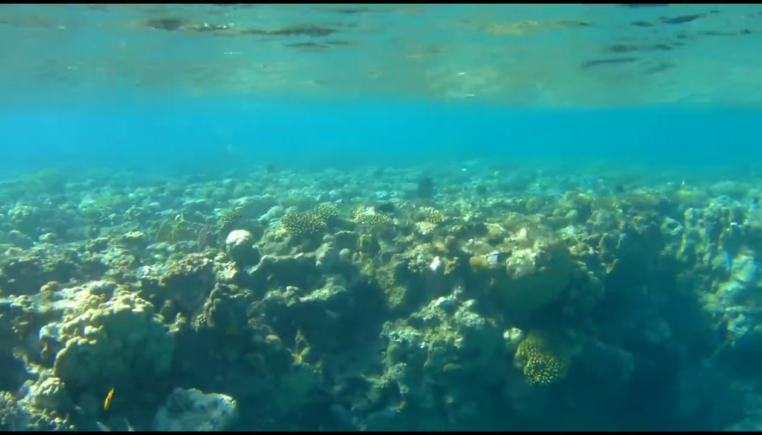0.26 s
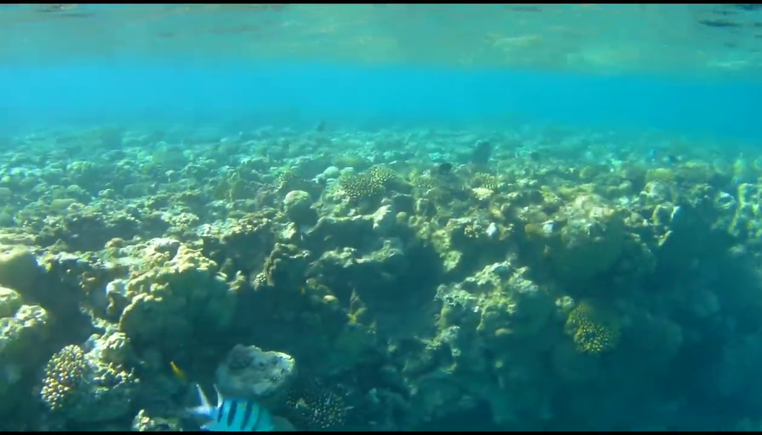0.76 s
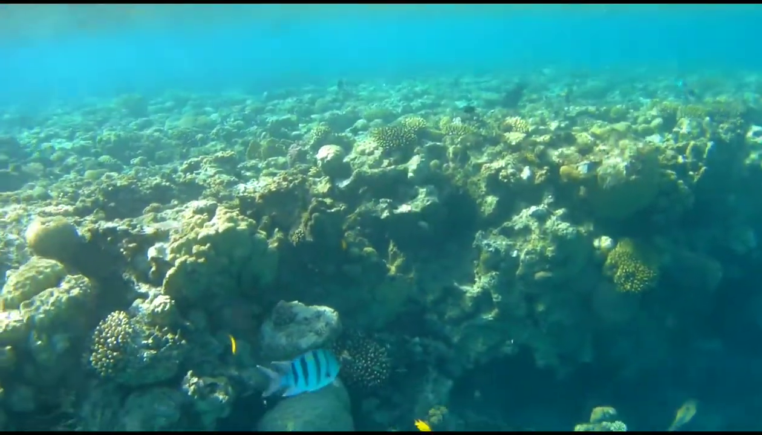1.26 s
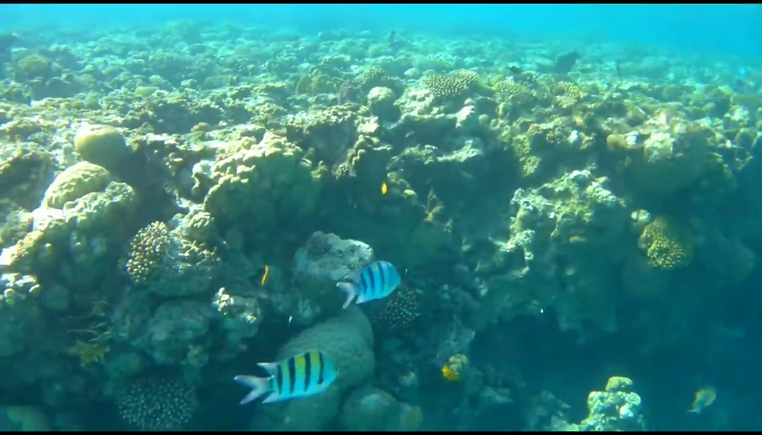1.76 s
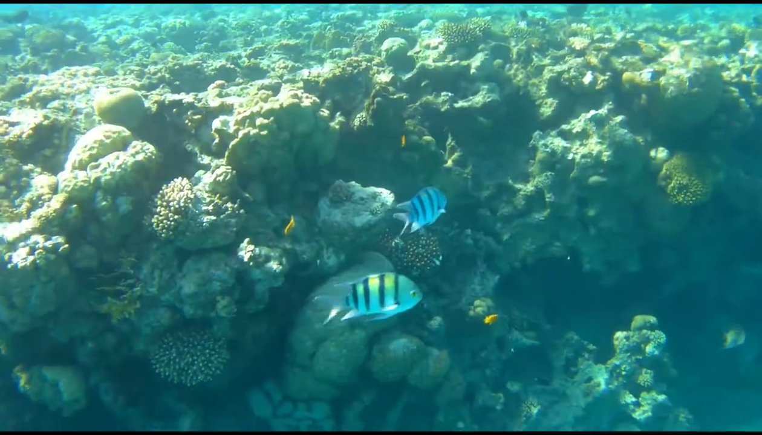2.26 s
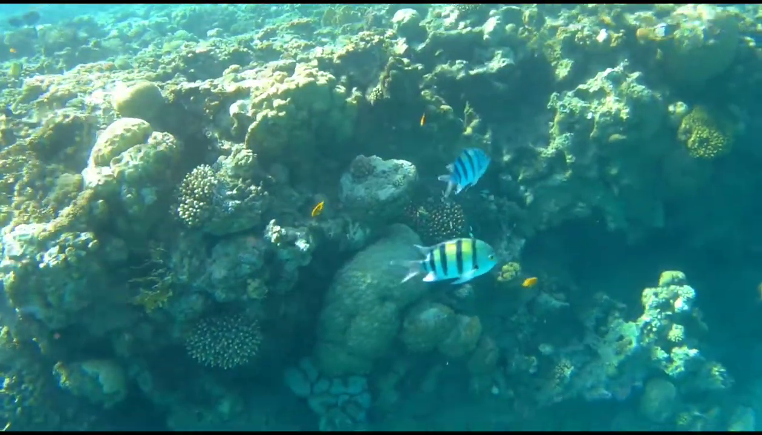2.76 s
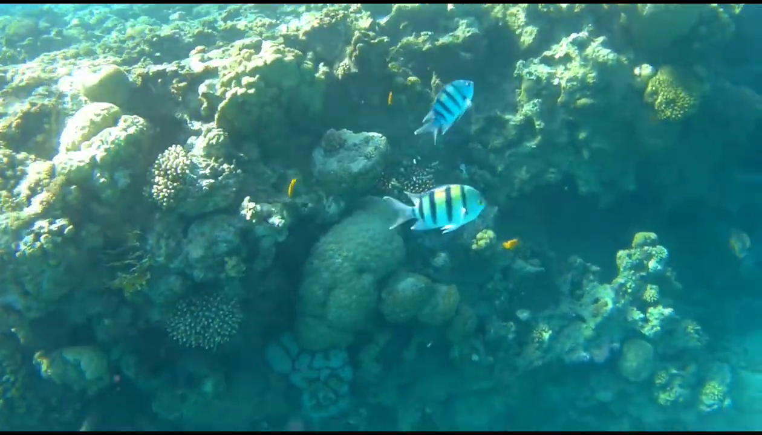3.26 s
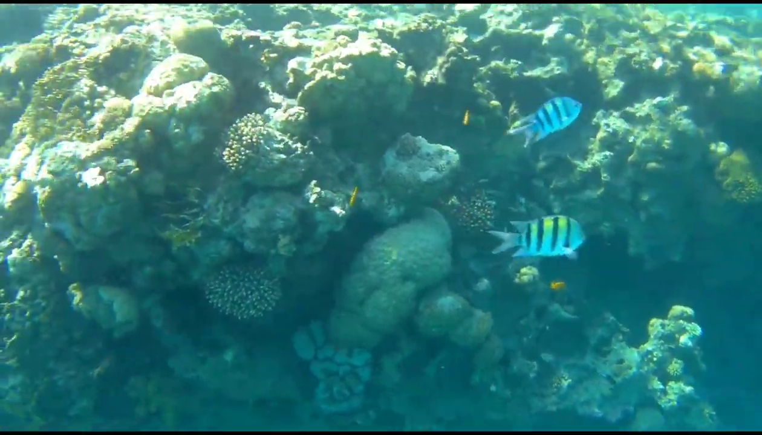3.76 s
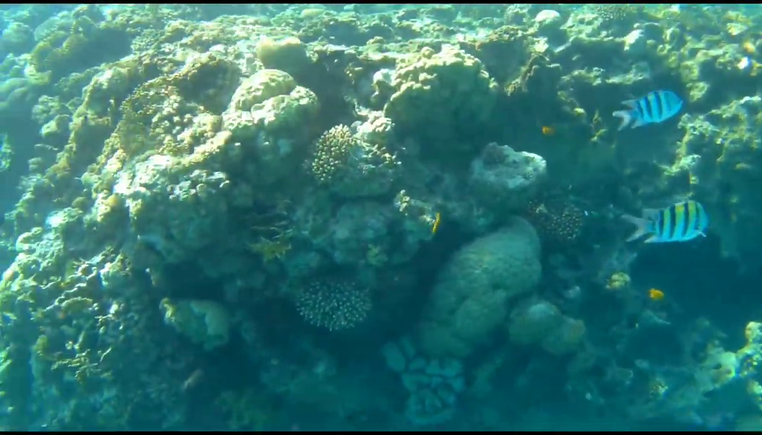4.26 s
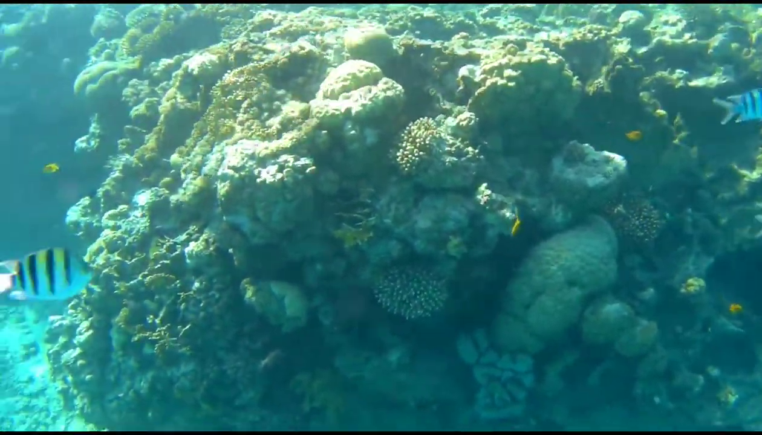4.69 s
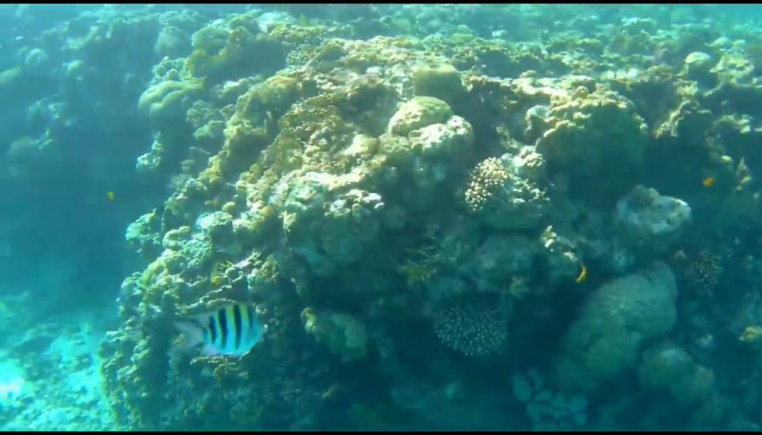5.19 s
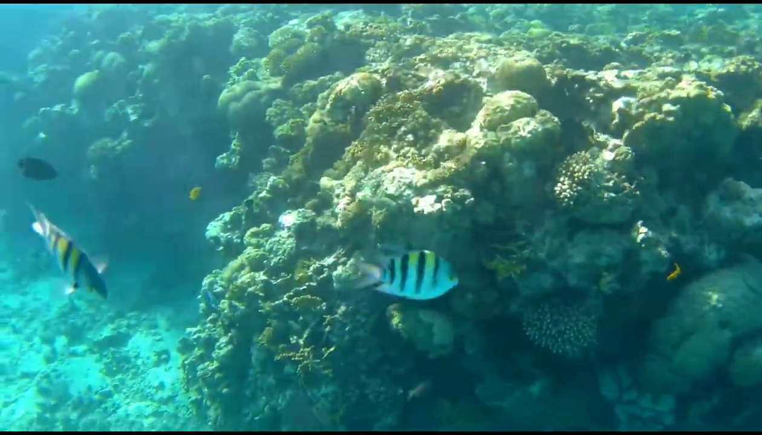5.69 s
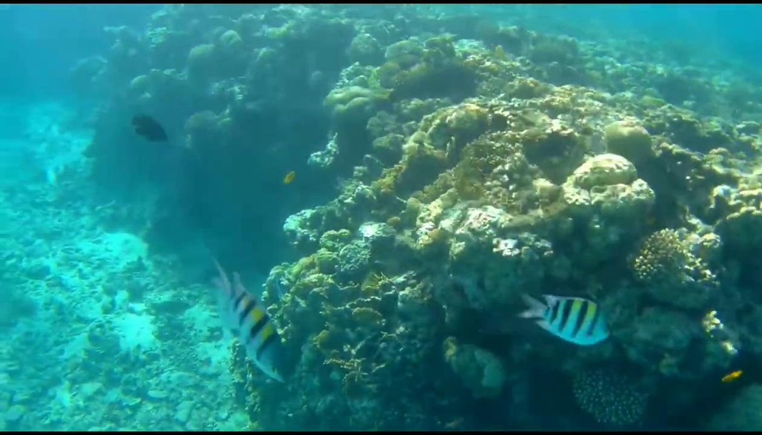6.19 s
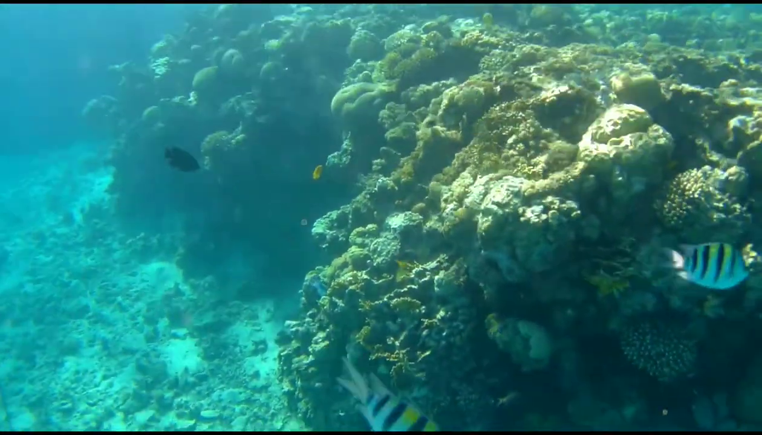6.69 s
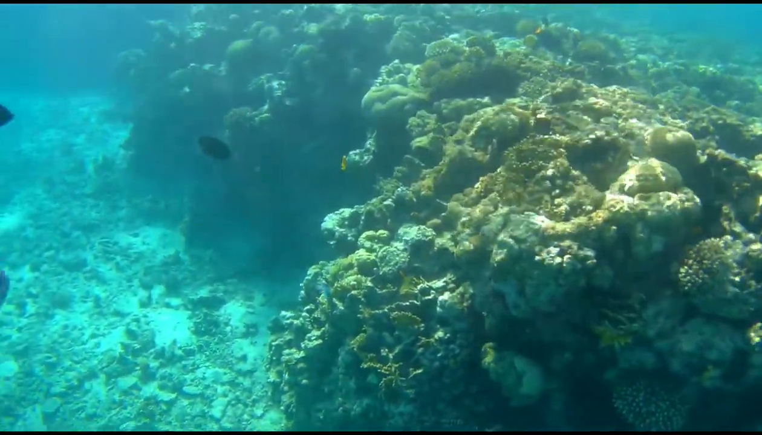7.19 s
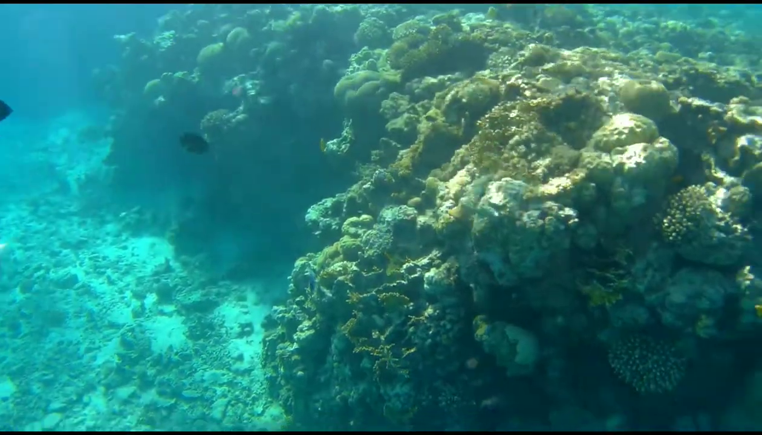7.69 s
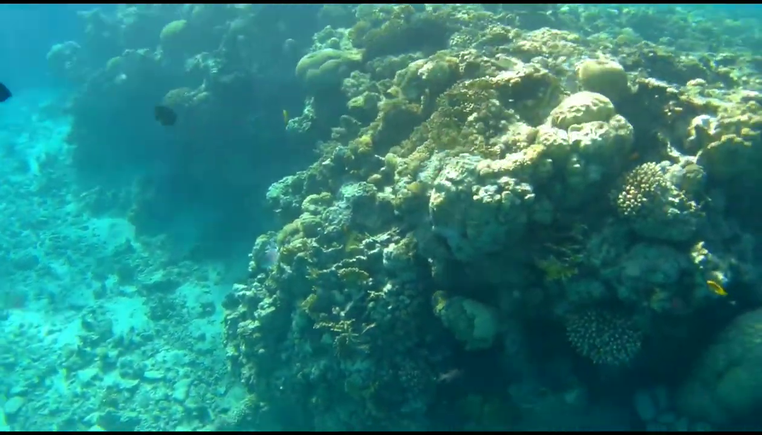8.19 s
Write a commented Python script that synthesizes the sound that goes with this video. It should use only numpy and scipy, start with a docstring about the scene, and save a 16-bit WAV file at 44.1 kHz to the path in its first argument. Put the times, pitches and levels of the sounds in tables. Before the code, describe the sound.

Underwater at a shallow reef, through a sealed housing with the microphone inside: boxy, muffled and close. A hollow hum around 640 Hz wavers constantly over low rumble, steady hiss and very faint high electronic buzz. A round bloop sounds at 0.1 s, a few more around 1.1 s, and dry shrimp clicks scatter through, notably at 0.5, 2.8 and 3.7 s. The hum stays modest until nearly 4 s. At 4.25-4.4 s a tight cluster of glugs and tiny splashes bursts out. Swells follow, with a bloop at 6.0 s alongside a dull bump. From 6.5 s surges strengthen; a short low hum sags at 6.6 s, and rapid gurgling peaks near 7.0 s. After a brief dip, dense bubbling, fizz and splashes peak at 7.7-7.9 s, with a sharp snap at 7.9 s. It thins after 8 s, ending with one glug and a soft bump near 8.4 s.

```python
"""Reef camera in a sealed housing

A small camera in a sealed housing drifts over a shallow reef. Moving water shakes the housing: filtered
noise at a few resonances gives a wavering hum. Bubbles ring as dying sines, snaps as short groups of modes;
dull bumps and one low hum pass by. Rumble, preamplifier hiss and gated electronic buzz lie underneath."""
import sys
import numpy as np
from scipy import signal
from scipy.fft import rfft, irfft, next_fast_len
from scipy.io import wavfile
from scipy.ndimage import uniform_filter1d

SR = 44100
rng = np.random.default_rng(int(sys.argv[2]) if len(sys.argv) > 2 else 0)


def store_pcm(level_fs):
    """Save levels as 16-bit WAV."""
    pcm = np.round(np.clip(level_fs, -1, 1) * 32767).astype(np.int16)
    wavfile.write(sys.argv[1], SR, np.atleast_2d(pcm).T)


N = 372627


def undb(db):
    """Gain of a level in dB."""
    return 10 ** (np.asarray(db) / 20)


def unit(x):
    """Scaled to rms 1."""
    return x / np.sqrt(np.mean(x ** 2))


def resonate(x, hz, width_hz):
    """Two-pole resonance, gain 1 at the centre."""
    return signal.lfilter(*signal.iirpeak(hz, hz / width_hz, fs=SR), x)


def walk(rate_hz):
    """Random levels held 1 / rate s and slewed twice; rms 1."""
    hold = int(SR / rate_hz)
    steps = np.repeat(rng.standard_normal(N // hold + 1), hold)
    slewed = uniform_filter1d(uniform_filter1d(steps, hold), hold)
    return unit(slewed[:N])


def add(out, start_s, sound):
    """Mix a sound in at a start time, cut at the end of the scene."""
    i = max(int(start_s * SR), 0)
    out[i:i + len(sound)] += sound[:N - i]


def patter(rate_hz, spread_db):
    """Impulses at random moments and of uneven size."""
    hit = rng.random(N) < rate_hz / SR
    impulses = hit * rng.standard_normal(N) * undb(spread_db * rng.random(N))
    return unit(impulses)


# splashes on the upper resonances: (time [s], level before the resonances [dB], t60 [s])
SPLASHES = [(4.246, -35, .04), (4.2983, -29, 0.12), (4.3408, -29, 0.033), (4.3626, -32, .04),
            (6.938, -31, .03), (7.4615, -37, 0.027), (7.638, -33, 0.053), (7.674, -34, .04),
            (7.716, -36, .04), (7.83, -33, 0.033), (7.845, -37, 0.091), (7.987, -33, .05),
            (1.201, -39, .04)]


def spray():
    """Splashes: decaying noise bursts, treble softened."""
    out = np.zeros(N)
    for start_s, db, t60_s in SPLASHES:
        t = np.arange(int(t60_s * SR)) / SR
        add(out, start_s, undb(db - 60 * t / t60_s) * rng.standard_normal(len(t)))
    return signal.lfilter(*signal.butter(4, 3600, fs=SR), out)


# water moving round the housing: (time [s], hum level [dB], upper resonances level [dB],
# lowest resonances level [dB], hum centre [Hz])
SURGE = [(0.0, -41, -47, -62, 645), (0.38, -44.5, -48, -52, 644), (0.68, -48, -50, -64, 661),
         (0.94, -45.5, -49, -55, 651), (1.18, -40.5, -47, -53, 638), (1.62, -41, -49, -51, 641),
         (2.04, -45.5, -50, -56, 641), (2.42, -38.5, -47, -45.5, 655), (3.01, -40, -48, -47, 640),
         (3.2, -43.5, -49, -42.5, 629), (3.41, -61, -49.5, -69, 619), (3.65, -43, -51, -55.5, 654),
         (3.88, -35.5, -48, -48.5, 641), (4.23, -33.5, -42, -40, 633), (4.38, -39, -45.5, -47.5, 629),
         (4.78, -30.5, -46, -41, 641), (4.94, -37, -47, -51, 640), (5.15, -40, -49, -43.5, 638),
         (5.41, -35.5, -50, -39, 628), (5.95, -42.5, -45, -46, 641), (6.19, -36, -47, -48, 638),
         (6.52, -30, -44.5, -44.5, 626), (6.68, -34, -42, -36.5, 641), (6.8, -28, -42, -36.5, 644),
         (6.87, -33, -44, -34, 645), (6.99, -31.5, -46, -40, 622), (7.11, -43.5, -46, -51, 661),
         (7.25, -33.5, -47, -40, 627), (7.48, -32, -43, -33, 638), (7.58, -29.5, -43, -35.5, 606),
         (7.7, -30.5, -42, -43, 670), (7.79, -40, -40.5, -42, 609), (7.88, -32, -40, -37.5, 635),
         (8.02, -47.5, -45, -50.5, 644), (8.14, -46, -46, -56, 654), (8.45, -34, -46, -45, 633)]
# housing resonances: (centre [Hz], nominal width [Hz], relative level [dB])
HOUSING = [(617.7, 61, 2.5), (681.4, 49, -6), (523, 77, -9.5), (413, 86, -14.5), (958, 750, -17),
           (1318, 147, 2), (1707, 136, -1), (2016, 246, -2.5), (2434, 990, -19.5), (3320, 1900, -11)]
UPPER_FROM_HZ, LOWEST_TO_HZ = 1050, 560
WIDEN = 1.77  # each of two cascaded passes is wider than nominal


def surge():
    """Turbulence, slaps and splashes excite three resonance groups with separate swells; the hum drifts."""
    times_s, hum_db, upper_db, lowest_db, hum_hz = np.transpose(SURGE)
    t = np.arange(N) / SR
    hum, uppers, lowest, splashed = np.zeros((4, N))
    slaps = patter(600, 13.0)
    splashes = spray()
    for hz, width_hz, db in HOUSING:
        wide_hz = WIDEN * width_hz
        upper = hz > UPPER_FROM_HZ
        # small bubbles tick against each high resonance separately; the rest share the slaps
        grain = patter(140, 12.5) if upper else slaps
        flicker_db = 2.64 * walk(32) if upper else 2.46 * walk(14)
        push = (rng.standard_normal(N) + .6 * grain) * undb(flicker_db)
        ringing = resonate(resonate(push, hz, wide_hz), hz, wide_hz)
        group = uppers if upper else hum if hz > LOWEST_TO_HZ else lowest
        group += undb(db) * unit(ringing)
        if upper:
            splash = resonate(resonate(splashes, hz, wide_hz), hz, wide_hz)
            splashed += splash * np.sqrt(5000 / width_hz) * undb(db / 2)
    # shift the hum's spectrum so that its main resonance follows the hum centre
    shift_hz = np.interp(t, times_s, hum_hz) - HOUSING[0][0]
    drift = np.exp(2j * np.pi * np.cumsum(shift_hz) / SR)
    hum = np.real(signal.hilbert(hum, next_fast_len(N))[:N] * drift)
    out = splashed
    for group, level_db in ((hum, hum_db), (uppers, upper_db), (lowest, lowest_db)):
        out = out + unit(group) * undb(np.interp(t, times_s, level_db))
    return out


RISE_SHARE = 0.013  # least swell time, share of t60
RISE_CYCLES, SMALL_RISE_CYCLES = 0.3, 0.51  # least swell time; small, high bubbles swell more gently
GLIDE_PER_S = 2.3  # big bubbles under the main resonance rise in pitch as they near the surface


def bubble(db, hz, t60_s):
    """A pocket of air rings as a dying sine; it needs at least a part of a cycle to get going."""
    t = np.arange(int(t60_s * SR)) / SR
    cycles = SMALL_RISE_CYCLES if hz > 1050 else RISE_CYCLES
    rise_s = max(RISE_SHARE * t60_s, cycles / hz)
    shape = (1 - np.exp(-t / rise_s)) ** 2 * np.exp(-np.log(1000) * t / t60_s)
    glide_per_s = GLIDE_PER_S if hz < 560 else 0
    tone = np.sin(2 * np.pi * hz * t * (1 + glide_per_s * t / 2))
    return undb(db) * shape / shape.max() * tone


# loudest bubbles and glugs, mostly near the resonances: (time [s], peak [dB], starting pitch [Hz], t60 [s])
BUBBLES = [(0.05, -31, 663, .08), (0.1153, -15.5, 628, 0.14), (0.1384, -30, 1750, 0.056),
           (0.185, -26.5, 649.5, 0.17), (0.258, -34, 1470, .04), (0.3019, -33, 1771, 0.051),
           (1.0349, -27, 657, 0.094), (1.076, -28.5, 1820, 0.048), (1.092, -34, 1345, 0.071),
           (1.14, -30, 560, 0.059), (1.163, -26.5, 689, 0.046), (1.2018, -20.5, 631, 0.062),
           (1.209, -29.5, 1270, 0.038), (1.281, -32, 663, 0.032), (1.4654, -29, 644, 0.18),
           (1.478, -36, 640, .1), (1.565, -32, 643, 0.043), (1.775, -29.5, 620, 0.06),
           (1.814, -30, 560, 0.055), (1.9865, -33, 2120, .04), (2.098, -30.5, 1333, .02),
           (2.4, -30.5, 665, 0.063), (2.592, -35, 625, 0.031), (2.7216, -31, 1730, 0.036),
           (2.792, -25, 644, 0.027), (2.84, -32.5, 655, 0.31), (3.074, -37, 3009, .02),
           (3.1259, -24, 1310, 0.047), (3.3387, -22, 580, 0.11), (3.3779, -28.5, 1334, 0.039),
           (3.6902, -31.5, 650, 0.31), (4.1064, -32.5, 1890, 0.036), (4.107, -23.5, 667, 0.042),
           (4.139, -34.5, 315, 0.08), (4.1456, -33, 1330, .05), (4.196, -32, 1220, .05),
           (4.205, -35, 1310, .06), (4.2458, -19, 640, 0.09), (4.2478, -36, 3091, .02),
           (4.262, -20, 636, .04), (4.272, -33, 2480, 0.03), (4.293, -19, 684, 0.05),
           (4.2998, -28, 1850, 0.034), (4.2998, -22, 1314, 0.046), (4.3017, -18, 633, 0.17),
           (4.3091, -31, 433, 0.22), (4.3127, -12, 603, 0.065), (4.3195, -12.5, 618, 0.085),
           (4.3265, -16, 635, 0.038), (4.326, -30, 1345, .066), (4.3364, -17.5, 604, 0.12),
           (4.3641, -28, 1200, 0.028), (4.3644, -24, 2080, 0.021), (4.3706, -18, 640, 0.051),
           (4.3846, -33, 2050, .04), (4.385, -19, 636, 0.026), (4.4245, -34, 1960, 0.044),
           (4.452, -29, 3680, 0.018), (4.457, -25.5, 605, 0.1), (4.538, -35, 3600, 0.017),
           (4.622, -27.5, 880, 0.1), (4.66, -27.5, 616, 0.11), (4.685, -34, 1890, .03),
           (4.73, -34, 1900, 0.037), (4.758, -36, 1450, 0.046), (4.9305, -24, 636, 0.043),
           (5.055, -33, 680, 0.047), (5.1416, -23.5, 640, 0.042), (5.245, -29, 614, 0.13),
           (5.29, -28, 619, 0.11), (5.5048, -28.5, 625, 0.091), (5.5128, -28.5, 1780, 0.038),
           (5.718, -23.5, 610, 0.061), (5.734, -32, 1600, .03), (5.746, -24.5, 1305, 0.016),
           (5.7579, -24.5, 1280, 0.023), (5.775, -33, 1700, .03), (5.9416, -23, 1890, 0.028),
           (5.972, -33, 1970, .02), (5.9854, -15.5, 636, 0.11), (5.99, -19.5, 1775, 0.046),
           (6.2148, -28, 1280, 0.025), (6.228, -32, 1800, .035), (6.452, -26, 620, 0.13),
           (6.525, -32, 1780, 0.05), (6.566, -21, 624, 0.071), (6.592, -27.5, 1410, 0.062),
           (6.6074, -18, 615, 0.097), (6.6502, -12, 620, 0.053), (6.6784, -26, 652, 0.1),
           (6.689, -18.5, 653, 0.089), (6.713, -15.5, 658, 0.11), (6.72, -19, 650, 0.032),
           (6.7676, -26, 578, .14), (6.8055, -32, 1380, .06), (6.8315, -14.5, 630, 0.051),
           (6.853, -18, 613, 0.057), (6.879, -23, 646, 0.078), (6.9123, -13.5, 577, 0.02),
           (6.925, -20, 600, 0.014), (6.936, -34, 1680, 0.023), (6.9392, -13, 640, 0.047),
           (6.9709, -15, 620, 0.05), (6.9796, -5.5, 600.3, 0.087), (6.9799, -17, 378, 0.038),
           (6.9894, -6.5, 631, 0.069), (7.0136, -15, 591, 0.037), (7.0358, -32.5, 1296, 0.056),
           (7.126, -23, 720, 0.042), (7.3258, -23, 629, 0.11), (7.3859, -32, 637, 0.034),
           (7.417, -34, 3200, .015), (7.459, -21.5, 395, 0.17), (7.463, -34, 1326, 0.055),
           (7.463, -35, 2920, .012), (7.495, -38, 1330, .03), (7.503, -24, 856, 0.034),
           (7.514, -39, 1350, .04), (7.5146, -23, 703, 0.037), (7.541, -34, 1320, 0.088),
           (7.549, -15.5, 575, 0.12), (7.5625, -21, 572, 0.044), (7.615, -35.5, 3532, 0.021),
           (7.5488, -42, 1930, 0.046), (7.615, -40, 2520, 0.027), (7.645, -24, 950, .05),
           (7.6369, -23.5, 1364, .07), (7.629, -36, 1980, 0.068), (7.639, -33, 2750, .015),
           (7.6529, -16, 686, 0.026), (7.6733, -22, 640, 0.12), (7.674, -23, 917, 0.066),
           (7.6738, -22.5, 1324, .047), (7.68, -36.5, 3560, .022), (7.6971, -5, 687, 0.047),
           (7.7055, -15.5, 657.5, 0.17), (7.708, -36, 2000, .03), (7.717, -26, 2800, 0.011),
           (7.72, -25, 1360, 0.048), (7.7247, -17, 607, 0.076), (7.7257, -18.5, 845, 0.071),
           (7.738, -39, 2460, 0.044), (7.7584, -32, 2450, 0.044), (7.785, -15.5, 527, 0.044),
           (7.79, -25, 525, 0.16), (7.7897, -27.5, 1370, 0.079), (7.8289, -30, 1980, 0.03),
           (7.8346, -20, 650, 0.17), (7.8455, -14, 1626, 0.038), (7.8529, -13, 895, 0.059),
           (7.8534, -8, 630, 0.024), (7.855, -19, 1570, 0.022), (7.8651, -27, 2020, 0.043),
           (7.879, -28, 1720, 0.02), (7.898, -17, 620, 0.013), (7.856, -15.5, 1000, 0.085),
           (7.8606, -16.5, 1430, 0.035), (7.871, -31, 3080, 0.017), (7.9147, -17.5, 620, 0.026),
           (7.932, -39, 3600, .015), (7.934, -32, 1330, .03), (7.9527, -20, 2130, .032),
           (7.9616, -29, 2020, .035), (7.987, -27, 1800, 0.014), (7.993, -25, 1840, 0.022),
           (7.994, -25.5, 635, 0.052), (8.017, -26, 1370, 0.033), (8.057, -40, 1850, 0.035),
           (8.101, -21, 660, 0.14), (8.1163, -29.5, 1726, 0.042), (8.1837, -28.5, 1820, 0.026),
           (8.345, -37, 653, 0.06), (8.399, -31, 628, 0.09), (8.4318, -21, 610, 0.16)]
# chance glugs near the main resonance: middle pitch, greatest peak above the hum, middle t60
GLUG_HZ, GLUG_OVER_DB, GLUG_T60_S = 640, 3.0, 0.09


def bubbles():
    """Big bubbles, chance glugs, and a fizz of small ones that thickens with the surge near resonances."""
    out = np.zeros(N)
    for start_s, db, hz, t60_s in BUBBLES:
        add(out, start_s, bubble(db, hz, t60_s))
    times_s, hum_db, upper_db, *_ = np.transpose(SURGE)
    t = np.arange(N) / SR
    crowd = np.cumsum(undb(.8 * np.interp(t, times_s, upper_db)))  # stronger flow tears off more bubbles
    upper_hz = [hz for hz, _, _ in HOUSING if hz > 700]
    for when, mode, spread, size, cycles in rng.random((1300, 5)):
        start_s = np.interp(when * crowd[-1], crowd, t)
        hz = upper_hz[int(len(upper_hz) * mode)] * (.92 + .16 * spread)
        tilt_db = -9.2 * abs(np.log2(hz / 1500))
        size_db = -1.86 * np.log(1 - .95 * size)  # a few are much louder
        db = np.interp(start_s, times_s, upper_db) + 4.0 + tilt_db + size_db
        add(out, start_s, bubble(db, hz, (14 + 30 * cycles) / hz))
    for when, spread, size, length in rng.random((40, 4)):
        start_s = when * N / SR
        db = np.interp(start_s, times_s, hum_db) + GLUG_OVER_DB - 6 * size
        hz = GLUG_HZ * (1 + 0.069 * (spread - .5))
        add(out, start_s, bubble(db, hz, GLUG_T60_S * (.5 + length)))
    return out


# shrimp snaps: (time [s], middle group peak before the high-pass [dB], treble re middle [dB],
# low ring re middle [dB], treble ring [Hz])
SNAPS = [(0.0208, -25.5, -18, -19, 7000), (0.5391, -23, -14, -5, 6400), (1.0823, -29, -5, -8, 6630),
         (2.3345, -28.5, -6, -13, 7400), (2.5495, -25, -9, -6, 8400), (2.763, -18, -17, 8, 7300),
         (2.8733, -36, 4, -9.5, 8900), (3.6595, -21.5, -7, -4, 8300), (3.7652, -35, -9, 4, 6680),
         (4.7904, -30, -6.5, -11, 6500), (5.0418, -30.5, -1, -12, 6830), (5.3935, -32, -4, -10, 8230),
         (5.433, -33, -14, -6, 6500), (6.8223, -36, -2, 7, 8500), (6.937, -42, -8, 15, 7500),
         (7.9063, -17, -14, 3, 7300)]
# snap modes: low and middle groups of (pitch [Hz], nominal t60 [s]);
# treble group of (ratio to the treble ring [1], nominal t60 [s])
SNAP_MODES = [
    [(1360, 0.0092), (1780, 0.016), (2100, 0.011)],
    [(2560, 0.0041), (3330, 0.0047), (4600, 0.0032)],
    [(1, 0.0048), (1.14, 0.0025), (1.66, 0.004)],
]
SNAP_RISE_S, SNAP_SCATTER_DB = .0007, 1.5


def snap_ring(modes, scale, t):
    """Short modes of uneven level, peak 1; alternating signs fill the gaps between neighbours."""
    ring = np.zeros(len(t))
    for k, (hz, t60_s) in enumerate(modes):
        db = SNAP_SCATTER_DB * rng.standard_normal() - 60 * t / t60_s
        ring += (-1) ** k * undb(db) * np.sin(2 * np.pi * hz * scale * t)
    ring *= (1 - np.exp(-t / SNAP_RISE_S)) ** 2
    return ring / np.abs(ring).max()


def snaps():
    """A claw's collapsing cavity: a quick pulse rings three mode groups; 60 faint chance snaps join."""
    out = np.zeros(N)
    t = np.arange(int(.02 * SR)) / SR
    faint = []
    for when, size, treble, pitch in rng.random((60, 4)):
        faint.append((when * N / SR, -47 + 10.0 * size, 6 * treble - 8.5, -6.1, 6300 + 2600 * pitch))
    low, middle, treble = SNAP_MODES
    for start_s, db, treble_db, low_db, treble_hz in list(SNAPS) + faint:
        add(out, start_s, undb(db + low_db) * snap_ring(low, 1, t))
        add(out, start_s, -undb(db) * snap_ring(middle, 1, t))
        add(out, start_s, undb(db + treble_db) * snap_ring(treble, treble_hz, t))
    return signal.lfilter(*signal.butter(2, 1000, "high", fs=SR), out)


# dull bumps of water against the housing: (time [s], peak [dB])
BUMPS = [(6.005, -26.5), (6.932, -31), (7.666, -32), (7.9, -32), (8.429, -25)]


def bumps():
    """A soft push: the start of a 110 Hz cycle, dying within a few ms."""
    out = np.zeros(N)
    t = np.arange(int(.04 * SR)) / SR
    push = np.sin(2 * np.pi * 110 * t) * np.exp(-t / 0.00084)
    for start_s, db in BUMPS:
        add(out, start_s, undb(db) * push / push.max())
    return out


HUM_START_S, HUM_ATTACK_S, HUM_HOLD_S, HUM_RELEASE_S = 6.59, 0.022, 0.1, .095
HUM_START_DB, HUM_FADE_DB_PER_S, HUM_START_HZ, HUM_SAG_HZ_PER_S = -30, -24, 117, 65


def low_hum():
    """A brief, nearly pure low tone close by: it swells, fades slowly, stops, and sags in pitch."""
    end_s = HUM_ATTACK_S + HUM_HOLD_S + HUM_RELEASE_S
    t = np.arange(0, end_s, 1 / SR)
    shape = np.clip(np.minimum(t / HUM_ATTACK_S, (end_s - t) / HUM_RELEASE_S), 0, 1) ** 2
    level = undb(HUM_START_DB + HUM_FADE_DB_PER_S * t)
    phase = 2 * np.pi * np.cumsum(HUM_START_HZ - HUM_SAG_HZ_PER_S * t) / SR
    out = np.zeros(N)
    add(out, HUM_START_S, shape * level * np.sin(phase))
    return out


# colour of sea rumble and preamplifier hiss: (frequency [Hz], relative density [dB per Hz])
FLOOR = [(12, -44.5), (20, -6.5), (70, -1), (392, -6.5), (647, -0.5), (1070, -13.5), (1330, -13),
         (1490, -36), (1760, -17), (2390, -17.5), (4170, -20.5), (14200, -23), (15400, -26)]
FLOOR_DB = -43  # rms before the rumble swells


def floor():
    """Steady preamplifier hiss of fixed colour; the rumble under 300 Hz grows a little with the surge."""
    hz, db = np.transpose(FLOOR)
    colour_db = np.interp(np.log(np.fft.rfftfreq(N, 1 / SR) + 1), np.log(hz), db)
    noise = unit(irfft(rfft(rng.standard_normal(N)) * undb(colour_db), N))
    rumble = signal.lfilter(*signal.butter(2, 300, fs=SR), noise)
    times_s, hum_db, *_ = np.transpose(SURGE)
    surge_db = np.interp(np.arange(N) / SR, times_s, hum_db)
    swell_db = 0.2 * (surge_db + 45.5) + 1.2 * walk(24)
    return undb(FLOOR_DB) * (undb(swell_db) * rumble + noise - rumble)


# bands that buzz once a frame: (centre [Hz], width [Hz], level [dB])
WHINE = [(10300, 200, -65.5), (11570, 150, -66.5), (14150, 240, -64), (9800, 200, -70)]
# bursts of faster buzz: (start [s], length [s])
BURSTS = [(5.537, 0.091), (5.776, 0.13), (6.226, 0.19), (6.629, 0.135), (7.022, .173), (7.47, 0.15),
          (7.788, .112), (8.262, 0.14)]
FRAME_HZ, BURST_HZ, BURST_DB = 59.94, 137, -55


def electronics():
    """Narrow hiss gated once a frame, and bursts of hiss pulsed twice per cycle of a faster rate."""
    t = np.arange(N) / SR
    frame_gate = .15 + (FRAME_HZ * t % 1 < .45)
    out = np.zeros(N)
    for hz, width_hz, db in WHINE:
        band = unit(resonate(frame_gate * rng.standard_normal(N), hz, width_hz))
        out += undb(db + 0.96 * walk(4.13)) * band
    first_pulse = np.exp(-(BURST_HZ * t % 1) / 0.25)
    second_pulse = np.exp(-((BURST_HZ * t + .6) % 1) / 0.12)
    chatter = (0.18 + first_pulse + second_pulse) * rng.standard_normal(N)
    band_pass = signal.butter(2, (9850, 11250), "band", fs=SR, output="sos")
    chatter = unit(signal.sosfilt(band_pass, chatter))
    active = np.zeros(N)
    for start_s, length_s in BURSTS:
        active += (t > start_s) & (t < start_s + length_s)
    active = uniform_filter1d(active, size=600)  # soft edges
    return out + chatter * undb(BURST_DB + 1.5 * walk(25)) * active


WANDER_HZ, WANDER_RMS_HZ, WANDER_HALF_WIDTH_HZ = 11000, 340, 200
WANDER_DB = -65  # before the carrier


def wander():
    """Faint electronic hiss: low-passed noise on a slowly drifting carrier."""
    band = unit(signal.lfilter(*signal.butter(2, WANDER_HALF_WIDTH_HZ, fs=SR), rng.standard_normal(N)))
    level = undb(WANDER_DB + 2.5 * walk(6))
    carrier_hz = WANDER_HZ + WANDER_RMS_HZ * walk(3)
    return level * band * np.sin(2 * np.pi * np.cumsum(carrier_hz) / SR)


# dead spot between the resonance groups: (centre [Hz], width [Hz], share removed [1])
DEAD_SPOT = (1068, 170, 0.56)


def scene():
    """Water sounds reach the microphone through the housing; floor and electronics join after."""
    hz, width_hz, share = DEAD_SPOT
    water = surge() + bubbles() + snaps() + bumps() + low_hum()
    heard = water - min(share, 1) * resonate(water, hz, width_hz)
    return (heard + floor() + electronics() + wander())[None]


TOP_HZ = 15500


def record(dry):
    """The recorder cuts the top with a steep low-pass."""
    return signal.sosfilt(signal.ellip(10, .2, 60, TOP_HZ, fs=SR, output="sos"), dry)


dry = scene()
out = record(dry)
store_pcm(out)
```